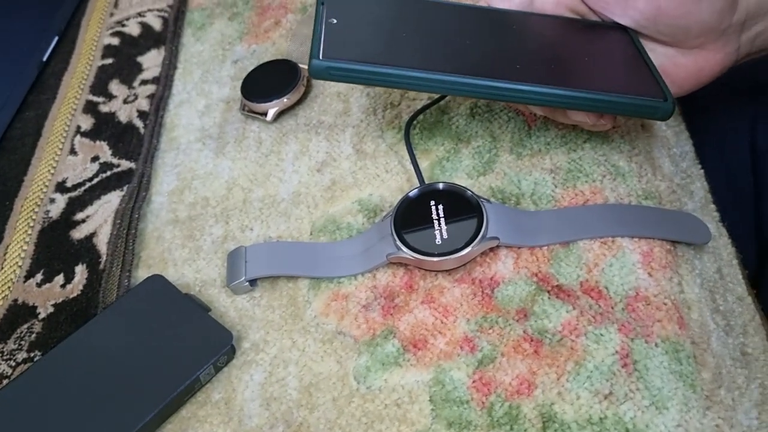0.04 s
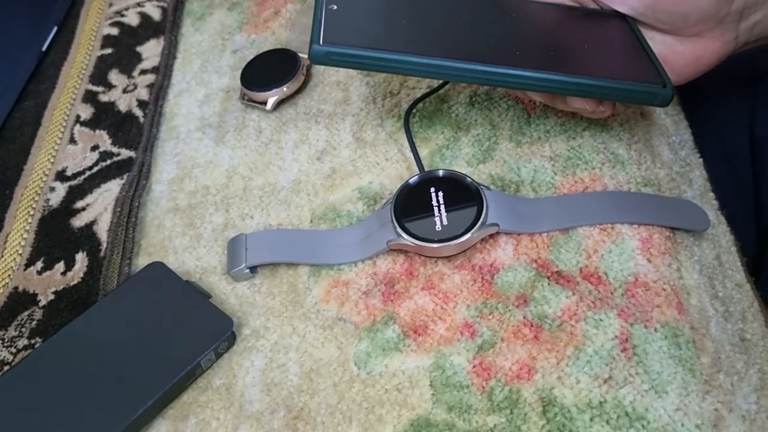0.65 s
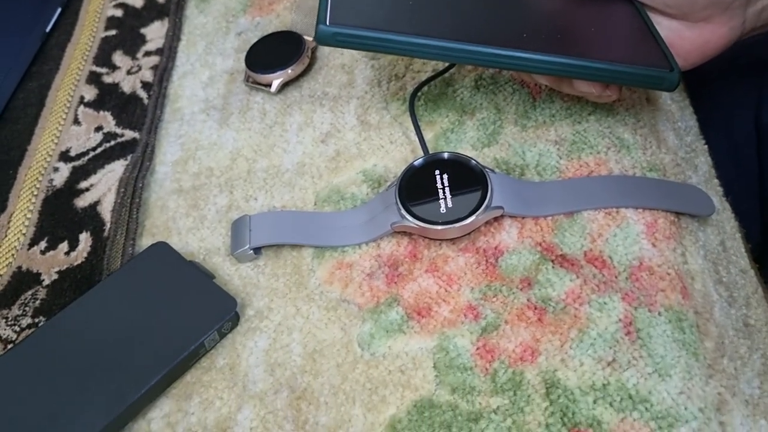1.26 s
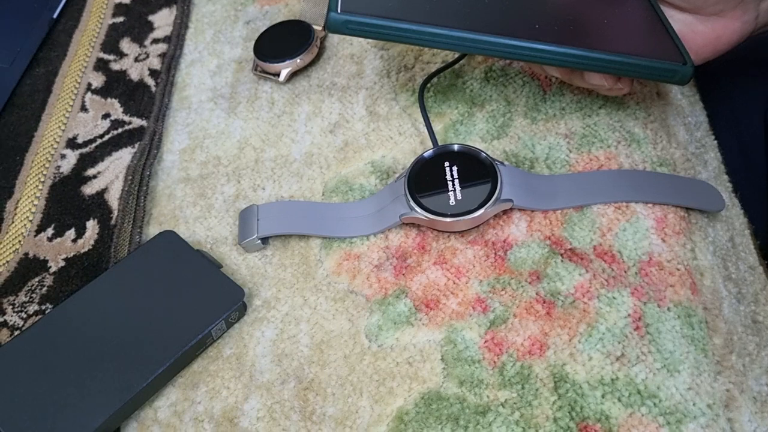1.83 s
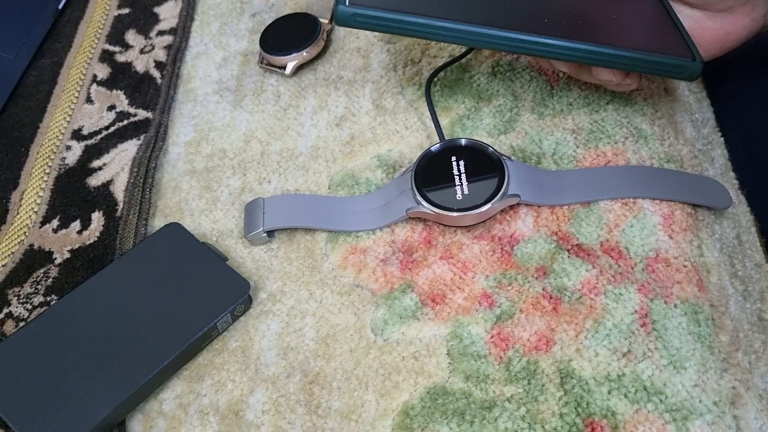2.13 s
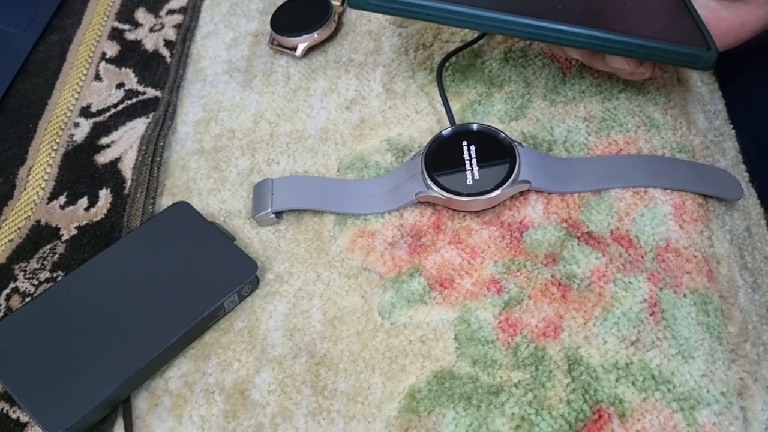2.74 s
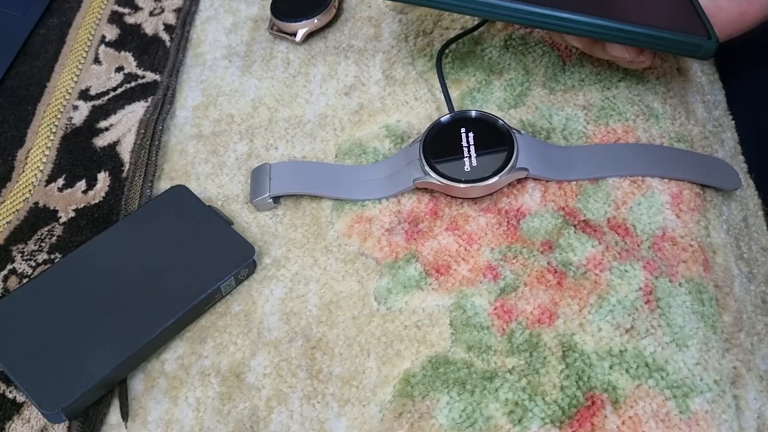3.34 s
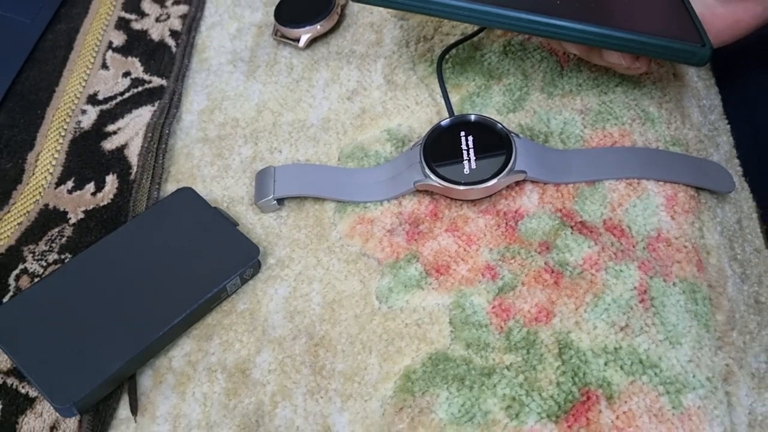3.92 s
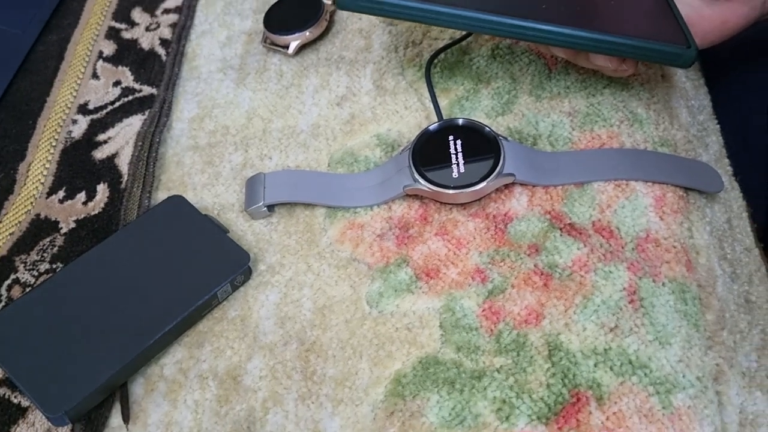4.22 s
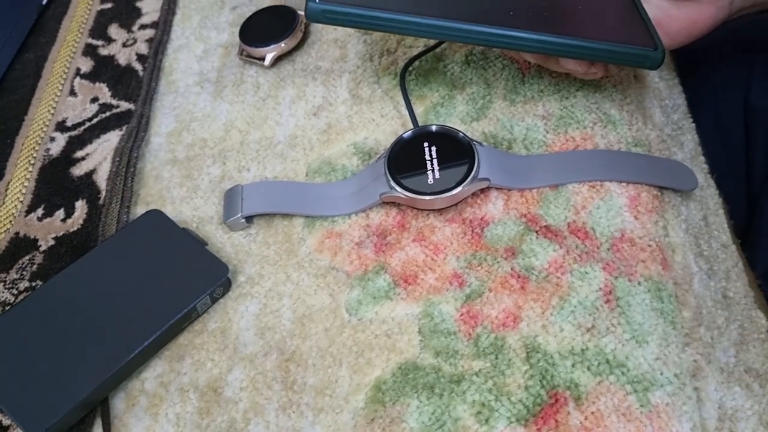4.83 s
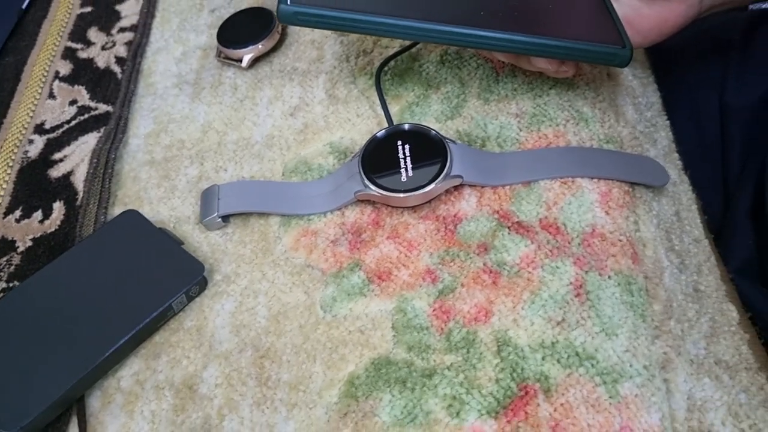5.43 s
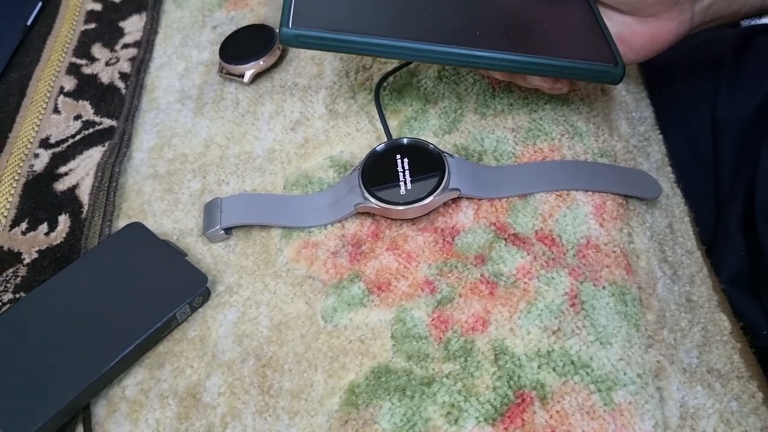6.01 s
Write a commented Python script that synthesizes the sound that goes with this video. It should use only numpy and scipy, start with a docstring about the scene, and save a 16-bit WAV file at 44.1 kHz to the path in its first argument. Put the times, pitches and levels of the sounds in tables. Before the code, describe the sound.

A hand shifts its grip on a phone in a quiet room. Tiny ticks of skin on the case lead to a sharp snap after about a second, and another comes a second and a half later. Near the end come short creaks with soft thuds and a brief sliding rustle. The handling is very close and mostly on the right, over a low rumble, electrical hum and thin hiss.

```python
"""Gripping a phone in a quiet room

Skin slips and creaks on the case, a finger slides along it, and the case snaps twice. These sounds
reach the right microphone through the phone's body and the left one faintly by air. Behind them are
a low rumble, a mains hum, a thin hiss and a soft swish once a second, perhaps a wall clock."""
import sys
import numpy as np
from scipy import signal
from scipy.fft import rfft, irfft, next_fast_len
from scipy.io import wavfile
from scipy.ndimage import uniform_filter1d

SR = 44100
rng = np.random.default_rng(int(sys.argv[2]) if len(sys.argv) > 2 else 0)


def generate_wav(signal):
    """Clip the signal to [-1, 1] and save it as 16-bit WAV at the path in sys.argv[1]."""
    frames = np.transpose(np.atleast_2d(signal))
    scaled = np.clip(frames, -1, 1) * 32767
    pcm = np.round(scaled).astype(np.int16)
    wavfile.write(sys.argv[1], SR, pcm)


N = 272097
TIME = np.arange(N) / SR


def undb(db):
    """Turn decibels into a number to multiply by."""
    return 10 ** (np.asarray(db) / 20)


def unit(x):
    """Scale a sound to an average strength (rms) of 1."""
    return x / np.sqrt(np.mean(x ** 2) + 1e-30)


def add(track, at_s, sound):
    """Mix a sound into a track at the given time."""
    start = max(int(at_s * SR), 0)
    part = sound[:max(N - start, 0)]
    track[start:start + len(part)] += part


def band(x, low_hz, high_hz):
    """Keep what lies between two frequencies."""
    return signal.sosfilt(signal.butter(3, [low_hz, high_hz], "band", fs=SR, output="sos"), x)


def colour(x, points):
    """Shape a sound's tone along a curve of (f/Hz, level/dB) points."""
    size = 2 * next_fast_len(len(x) // 2 + 1024)
    hz, db = np.transpose(points)
    freq = np.maximum(np.arange(size // 2 + 1) * SR / size, 1)
    gain = undb(np.interp(np.log(freq), np.log(hz), db))
    # folding the cepstrum makes the filter ring only after a sound, never before
    cepstrum = irfft(np.log(gain))
    cepstrum[1:size // 2] *= 2
    cepstrum[size // 2 + 1:] = 0
    return irfft(rfft(x, size) * np.exp(rfft(cepstrum)), size)[:len(x)]


def drift(turns_per_s):
    """A random curve that wanders around zero, mostly between -1 and 1."""
    knots = rng.standard_normal(int(N / SR * turns_per_s) + 2)
    return np.interp(TIME * turns_per_s, np.arange(len(knots)), knots)


def grains(size, spread_db):
    """Ridges of skin let go in many tiny clicks, a few much stronger than the rest."""
    return unit(rng.standard_normal(size) * undb(spread_db * rng.standard_normal(size)))


def ring(tones):
    """The tones of a struck object, together peaking at 1; each fades 60 dB in its ring time."""
    t = TIME[:SR // 6]
    sound = sum(undb(db - 60 * t / ring_s) * np.sin(2 * np.pi * hz * t) for hz, db, ring_s in tones)
    return sound / np.abs(sound).max()


# the tone of the still room: f/Hz, level/dB
ROOM_TONE = [(20, -27), (33, -18), (47, 1), (65, -8.5), (90, -12.5), (180, -13), (280, -17.5), (420, -27),
             (680, -36.5), (1050, -32), (1600, -45), (4000, -50.5), (9000, -57.5), (13500, -46),
             (16000, -49)]

def room(db=-52, split_hz=500, rumble_hz=110, waver_db=1.5):
    """A wavering rumble that both microphones mostly share, under hiss that differs between them."""
    shared = band(rng.standard_normal(N), 15, split_hz)
    swell = undb(waver_db * drift(4))
    bass_filter = signal.butter(2, rumble_hz, fs=SR, output="sos")
    sides = []
    for own in rng.standard_normal((2, N)):
        noise = shared + 0.31 * own + 0.54 * band(own, split_hz, 19000)
        air = undb(db) * unit(colour(noise, ROOM_TONE))
        rumble = signal.sosfiltfilt(bass_filter, air)
        sides.append(air + (swell - 1) * rumble)
    return np.array(sides)


# the tones of the mains hum: f/Hz, level/dB
HUM_TONES = [(59.9, -70), (119.9, -49), (179.6, -63), (239.6, -65), (294, -72)]

def hum(waver_db=1, right_lag_s=.0006):
    """Mains power hums with a slight waver, a touch later and softer on the right."""
    out = np.zeros((2, N))
    for hz, db in HUM_TONES:
        phase = 2 * np.pi * hz * (TIME - np.array([[0], [right_lag_s]])) + 0.098 * drift(2.4)
        out += np.sqrt(2) * undb(db + waver_db * drift(4.5)) * np.sin(phase)
    return out * undb([[.25], [-.25]])


def hiss(hz=2300, width_hz=560, full_db=-69, full_at_s=3, growth_db_per_s=7.5, waver_db=3.75):
    """A thin, wavering hiss, mostly on the right, that grows and then stays."""
    noise = rng.standard_normal(N)
    core = unit(band(noise, hz - width_hz / 2, hz + width_hz / 2))
    edges = undb(-12) * unit(band(noise, hz - width_hz, hz + 2 * width_hz))
    db = full_db - growth_db_per_s * np.maximum(full_at_s - TIME, 0)
    return unit(core + edges) * undb(db + waver_db * drift(5)) * undb([[-15], [0]])


# one distant pip: t/s, half length/s, level/dB, f/Hz
FAR_PIP = (.408, .012, -66, 900)

def pip():
    """A faint, short pip of narrow noise from further off in the room."""
    at_s, half_s, db, hz = FAR_PIP
    swell = np.exp(-((TIME - at_s) / half_s) ** 2)
    return undb(db) * swell * unit(band(rng.standard_normal(N), 0.87 * hz, 1.15 * hz))


# the tone of a swish: f/Hz, level/dB
SWISH_TONE = [(400, -26), (1000, 7), (1600, 1), (3000, 3), (4000, -3), (5300, 7), (6800, -6.5),
              (8500, -36.5), (16000, -36.5)]

def swishes(first_s=.535, every_s=.999, rise_s=0.031, fade_s=0.05, tock_db=4, growth_db_per_s=0.75):
    """Soft puffs of noise, weak and strong in turn like tick and tock, slowly getting louder."""
    swell = np.zeros(N)
    for count, at_s in enumerate(np.arange(first_s, N / SR, every_s)):
        db = -65 + tock_db * (count % 2) + growth_db_per_s * at_s
        before, after = np.minimum(TIME - at_s, 0), np.maximum(TIME - at_s, 0)
        swell += undb(db) * np.exp(-(before / rise_s) ** 2 / 2 - after / fade_s)
    noise = np.array([unit(colour(side, SWISH_TONE)) for side in rng.standard_normal((2, N))])
    return swell * noise * undb([[-10], [0]])


# light touches heard through the air: t/s, half length/s, level/dB, f/Hz
LIGHT_TOUCHES = [(0.757, 0.0091, -61, 6400), (0.761, 0.017, -63, 2470), (1.825, 0.0056, -65, 5840),
                 (2.263, 0.01, -60, 4540), (2.277, 0.024, -61, 2480), (2.292, 0.024, -62.5, 4760),
                 (2.828, 0.038, -65, 4160), (3.22, 0.13, -74.5, 3690)]

def brushes(broad_db=-3, left_db=-10):
    """A fingertip barely grazes the edge: a puff of hiss that stands out at one pitch."""
    out = np.zeros(N)
    for at_s, half_s, db, hz in LIGHT_TOUCHES:
        noise = rng.standard_normal(N)
        focused = unit(band(noise, 0.9 * hz, 1.1 * hz))
        broad = undb(broad_db) * unit(band(noise, 930, 4600))
        out += undb(db) * unit(focused + broad) * np.exp(-((TIME - at_s) / half_s) ** 2)
    return out * undb([[left_db], [0]])


def press(start_s, peak_s, end_s, swell_db_per_s=135.5, fade_db_per_s=160, touch_s=0.0039, lift_s=.015):
    """The pressure of one slide: the finger lands, pushes harder, eases off and lifts."""
    db = -swell_db_per_s * np.maximum(peak_s - TIME, 0) - fade_db_per_s * np.maximum(TIME - peak_s, 0)
    landing = np.clip((TIME - start_s) / touch_s, 0, 1)
    lifting = np.exp(-np.maximum(TIME - end_s, 0) / lift_s)
    return undb(db) * landing * lifting


# the tone of a sliding finger, heard through the phone: f/Hz, level/dB
SLIDE_TONE = [(150, -4), (300, 3.5), (550, 2.5), (900, -0.5), (1300, -2), (1900, -4), (2400, -2.5),
              (3000, -3.5), (3800, -5), (5000, -4.5), (6200, -15.5), (7400, -25), (8400, -35.5),
              (13000, -13.5), (16000, -29.5)]
# finger slides: landing t/s, peak t/s, lifting t/s, treble level/dB, lows against treble/dB
FINGER_SLIDES = [(1.084, 1.143, 1.43, -65.5, -4), (1.232, 1.265, 1.315, -53, 2.5),
                 (2.494, 2.54, 2.55, -62.5, 4.5), (2.59, 2.616, 2.7, -65, 4.5),
                 (2.808, 2.832, 2.845, -54.5, 0.5), (4.85, 4.88, 6.7, -64.5, 2.5),
                 (4.93, 5.047, 5.03, -58.5, 3.5), (5.061, 5.144, 5.4, -32.5, 3),
                 (5.214, 5.319, 5.48, -50.5, 0), (5.477, 5.607, 5.78, -49.5, 4),
                 (5.923, 5.95, 5.99, -57, 0), (5.994, 6.084, 6.46, -62, 3.5)]

def slides(patchy_db=2, rumble_db=-6, sheen_db=-32, sheen_growth=0.58):
    """A sliding finger makes a stream of tiny clicks; the lighter the touch, the brighter it sounds."""
    force = grains(N, spread_db=3) * undb(patchy_db * drift(260))
    rubbing = colour(force, SLIDE_TONE)
    low, high = unit(band(rubbing, 180, 2600)), unit(band(rubbing, 2830, 15000))
    rumble, sheen = unit(band(force, 50, 260)), unit(band(force, 11000, 15500))
    out = np.zeros(N)
    for start_s, peak_s, end_s, db, low_db in FINGER_SLIDES:
        level = undb(db) * press(start_s, peak_s, end_s)
        out += level * (high + undb(low_db) * (low + undb(rumble_db) * rumble))
        out += undb(sheen_db) * level ** sheen_growth * sheen
    return out


# the low tones of the phone rocking in the hand: f/Hz, level/dB, ring time/s
ROCKING_TONES = [(72, -14.5, 0.085), (138, 5, 0.023), (230, -4.5, .016)]

def nudge(at_s, slip_db, firm_from_s=4.4, firm_db=9.5):
    """A slip rocks the phone with a thud, louder for a stronger slip and once the grip is firm."""
    db = -21.5 + .45 * slip_db + firm_db * (at_s > firm_from_s)
    return -undb(db) * ring(ROCKING_TONES)


def grip(length_s, rise, tail):
    """The pressure of one slip: it builds, holds, then the skin sticks. Rise and tail are fractions."""
    progress = TIME[:SR // 14] / length_s
    return np.minimum(progress / rise, 1) * np.exp(-np.maximum(progress - .7, 0) / tail)


# how the phone's body carries rubbing: f/Hz, level/dB
BODY_TONE = [(60, -12.5), (170, 4.5), (300, 7), (550, 5.5), (950, -1), (1300, 0), (1700, -2.5),
             (2300, -1.5), (3000, -7), (3900, -4), (5100, -4.5), (6600, -16), (8600, -34), (10500, -24.5),
             (13000, -20.5), (16000, -20)]

def contact(force, length_s, db, bright_db):
    """A brief rub travels through the phone; a harder contact has more treble."""
    carried = colour(force, BODY_TONE)
    low, high = unit(band(carried, 220, 2800)), unit(band(carried, 2800, 18000))
    return (low + undb(bright_db) * high) * undb(db) * np.sqrt(length_s * SR / len(carried))


# short slips of skin on the case: t/s, length/s, level/dB, brightness/dB
SKIN_SLIPS = [(0.752, 0.0053, -52.5, -7.5), (1.099, 0.0053, -50.5, -3.5), (1.112, 0.0047, -62, 3),
              (1.131, 0.0031, -60, -1), (1.149, 0.0044, -55, -4), (1.176, 0.0031, -48, -1.5),
              (1.216, 0.0065, -45.5, -1), (1.251, 0.0062, -34, 7), (1.261, .009, -29.5, 1.5),
              (1.281, .0041, -37, -21), (1.297, .011, -38.5, -4), (1.941, .0057, -56, -5.5),
              (2.264, 0.0063, -54, -8.5), (2.55, 0.0061, -40, -3.5), (2.604, .01, -51, -10.5),
              (2.649, 0.022, -36.5, -7.5), (2.653, 0.0094, -35, -14), (2.895, 0.0046, -54.5, -9),
              (3.143, 0.0042, -49.5, -6.5), (4.331, 0.0027, -58.5, -7), (4.87, 0.014, -44, -3),
              (4.926, .0061, -36, -6.5), (4.959, 0.0091, -47, 0.5), (4.986, 0.0086, -41.5, -6.5),
              (5.012, 0.011, -41.5, -2), (5.044, 0.0093, -37, -2), (5.064, 0.0085, -34, -4.5),
              (5.257, 0.011, -42, -5), (5.604, 0.013, -49, 3), (5.982, .013, -53, -1),
              (6.02, 0.0038, -42.5, -1), (6.046, 0.0092, -45, -4)]

def slips(lead_s=.0007):
    """Skin loses its hold in a burst of tiny clicks and nudges the whole phone."""
    out = np.zeros(N)
    for at_s, length_s, db, bright_db in SKIN_SLIPS:
        pressure = grip(length_s, rise=0.22, tail=0.39)
        force = pressure * grains(len(pressure), spread_db=4)
        add(out, at_s - lead_s, contact(force, length_s, db, bright_db))
        add(out, at_s, nudge(at_s, db))
    return out


# the tone that tight skin gives a creak: f/Hz, level/dB
TIGHT_SKIN_TONE = [(280, 6), (600, 1), (1300, 7.5), (2500, 2), (3800, -2), (6000, -7)]
# creaks of skin: t/s, length/s, level/dB, brightness/dB, release rate/Hz
SKIN_CREAKS = [(4.55, 0.012, -28.5, 0.5, 2229), (4.699, 0.01, -31.5, -6, 1806),
               (4.842, 0.0081, -31, -6.5, 2205), (6.093, 0.006, -42, -9, 1785),
               (6.136, 0.00399, -39, -10.5, 2340), (6.163, 0.0048, -41, -14, 2230)]

def creaks(jitter=0.24, roughness=0.6, echo_gain=0.18, echo_s=0.0046):
    """Skin sticks and lets go in a fast, uneven run; the jolt echoes back through the case."""
    out = np.zeros(N)
    for at_s, length_s, db, bright_db, rate_hz in SKIN_CREAKS:
        pressure = grip(length_s, rise=0.23, tail=0.03)
        wander = unit(uniform_filter1d(rng.standard_normal(len(pressure)), size=20))
        cycles = np.cumsum(rate_hz * np.exp(jitter * wander)) / SR
        releases = np.diff(np.floor(cycles), prepend=-1)  # one click per cycle
        force = unit(releases - releases.mean()) + roughness * grains(len(pressure), spread_db=5.2)
        creak = contact(colour(pressure * force, TIGHT_SKIN_TONE), length_s, db, bright_db)
        add(out, at_s, creak)
        add(out, at_s + echo_s, echo_gain * band(creak, 810, 7500))
        add(out, at_s, undb(2) * nudge(at_s, db))
    return out


# the tones the case rings with: f/Hz, level/dB, ring time/s
CASE_TONES = [(249.2, -21.5, 0.0057), (518.4, -9, 0.012), (710, -11, 0.0097), (974, -1.5, 0.0066),
              (1420, -8, .005), (2090, -13, 0.0059), (3924, -3, 0.003), (3000, -13.5, .003),
              (4260, -42.5, 0.049), (5380, -9, 0.0046), (6500, -15, .002), (12800, -12, .0016)]
# the snaps' tone, with a dip near 8.5 kHz that softens their sharp edge: f/Hz, level/dB
SNAP_TONE = [(7200, -0.5), (8500, -18), (11500, -4), (13500, -1)]
# snaps of the case: t/s, level/dB, brightness/dB, thud level/dB, pitch factor of the high tones
CASE_SNAPS = [(1.2624, -1, 5.5, -19, 1.1), (2.6693, 1.5, 2, -17, 0.993)]

def snaps(crack_db=-21, crack_s=0.0019, split_hz=2000, low_lag_s=0.00022, thud_lag_s=0.0014):
    """The case gives way under the grip: it cracks, rings briefly, and the phone rocks in the hand."""
    out = np.zeros(N)
    thud = ring(ROCKING_TONES) + undb(-8) * ring([(70, 0, .055)])
    low = ring([tone for tone in CASE_TONES if tone[0] < split_hz])
    t = TIME[:len(thud)]
    for at_s, db, bright_db, thud_db, pitch in CASE_SNAPS:
        high = ring([(hz * pitch, level, ring_s) for hz, level, ring_s in CASE_TONES if hz >= split_hz])
        noise = unit(colour(grains(len(t), spread_db=1.8), BODY_TONE))
        crack = undb(crack_db) * noise * np.exp(-t / crack_s)
        add(out, at_s, undb(db + bright_db) * (crack - 0.65 * high))
        # slow bending waves bring the low tones a moment after the high ones
        add(out, at_s + low_lag_s, 0.55 * undb(db) * low)
        add(out, at_s + thud_lag_s, -undb(thud_db) * thud)
    return colour(out, SNAP_TONE)


def to_microphones(sound, air_db, room_db, ring_s=0.3, smear_s=.0007):
    """The right side gets the sound whole, the left thin and smeared by air; both get faint echoes."""
    t = TIME[:SR // 2]
    thin = band(sound, 900, 7500)
    tails = rng.standard_normal((2, len(t))) * undb(-60 * t / ring_s) * np.minimum(t / .006, 1)
    echoes = np.array([signal.fftconvolve(thin, tail / np.linalg.norm(tail))[:N] for tail in tails])
    paths = rng.standard_normal(len(t)) * np.exp(-t / smear_s)
    smeared = 0.29 * sound + .7 * signal.fftconvolve(sound, paths / np.linalg.norm(paths))[:N]
    left = undb(air_db) * band(smeared, 800, 15000)
    return np.array([left, sound]) + undb(room_db) * echoes * undb([[-1], [5]])


def scene():
    """Handling over the quiet room; snaps stay mostly in the phone and stir the room less than rubbing."""
    rubbing = to_microphones(slips() + creaks() + slides(), air_db=-20, room_db=-35)
    snapping = to_microphones(snaps(), air_db=-20.5, room_db=-41)
    return rubbing + snapping + brushes() + swishes() + pip() + hum() + room() + hiss()


def record(dry, bottom_hz=37, top_hz=15850, limit=.85):
    """The phone drops the deepest bass, clips the peaks and cuts the highest treble."""
    lean = signal.sosfilt(signal.butter(5, bottom_hz, "high", fs=SR, output="sos"), dry)
    clipped = np.clip(lean, -limit, limit)
    return signal.sosfilt(signal.ellip(10, .2, 90, top_hz, fs=SR, output="sos"), clipped)


dry = scene()
out = record(dry)
generate_wav(out)
```